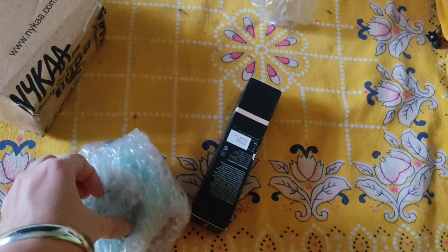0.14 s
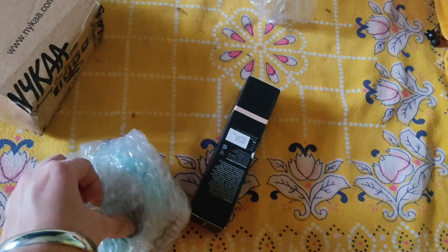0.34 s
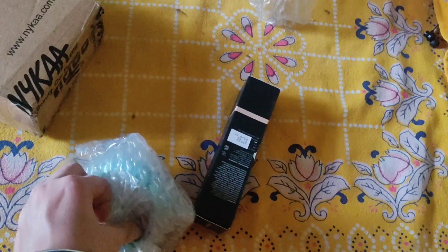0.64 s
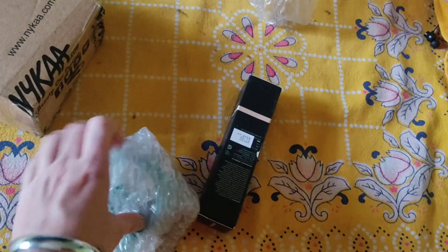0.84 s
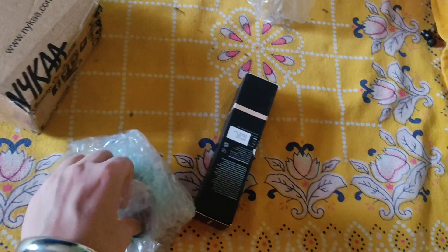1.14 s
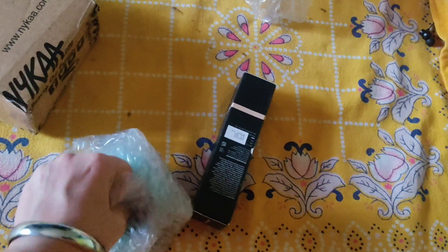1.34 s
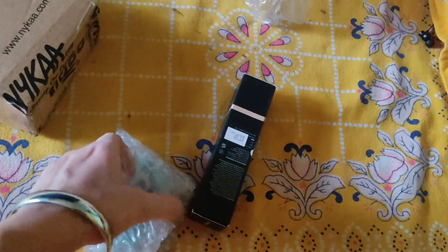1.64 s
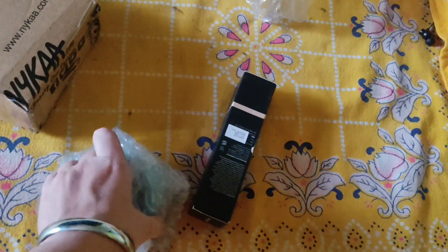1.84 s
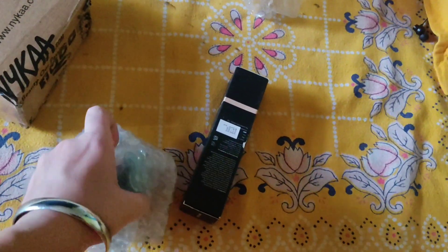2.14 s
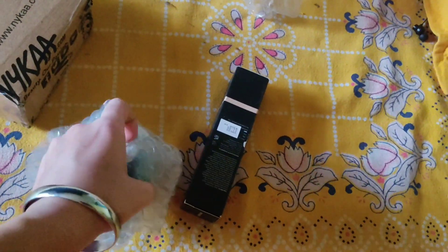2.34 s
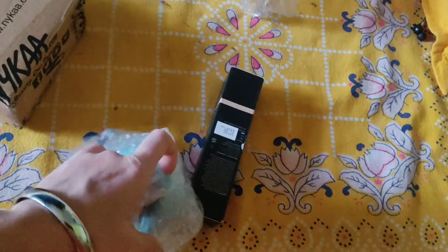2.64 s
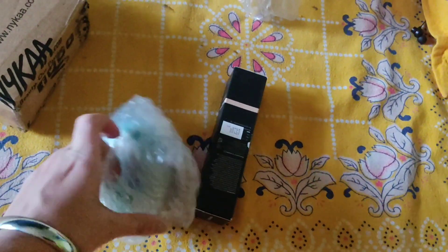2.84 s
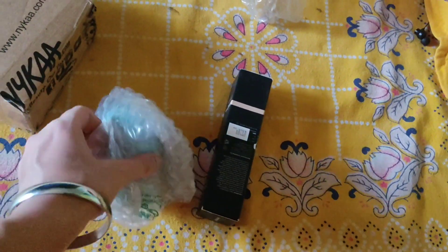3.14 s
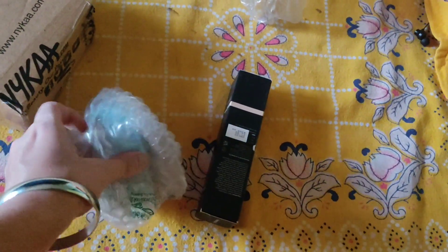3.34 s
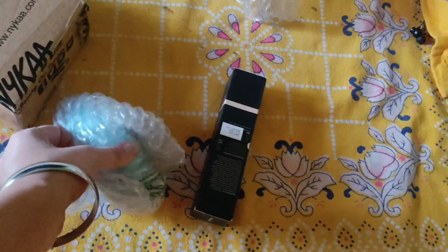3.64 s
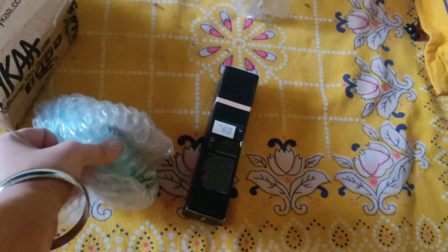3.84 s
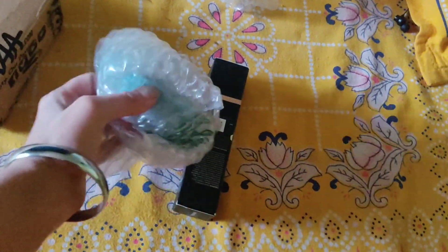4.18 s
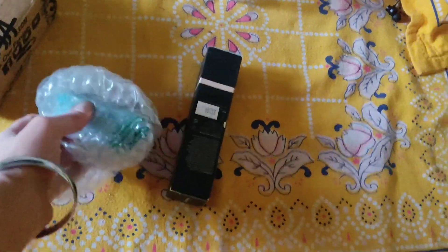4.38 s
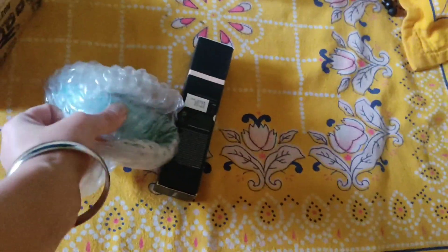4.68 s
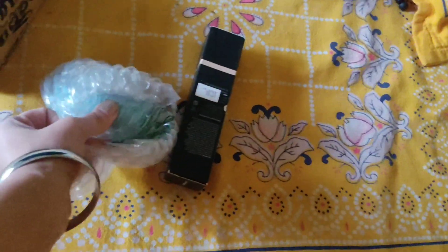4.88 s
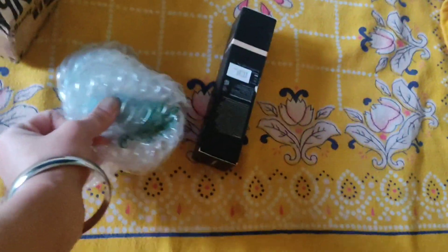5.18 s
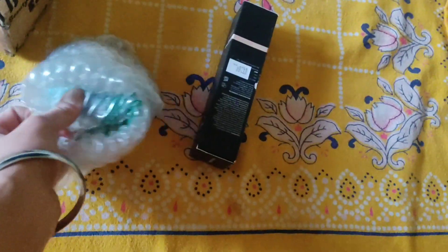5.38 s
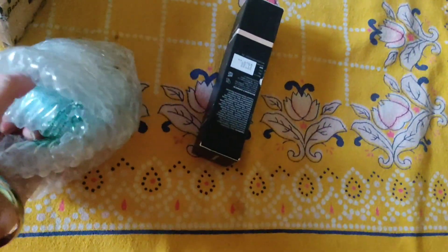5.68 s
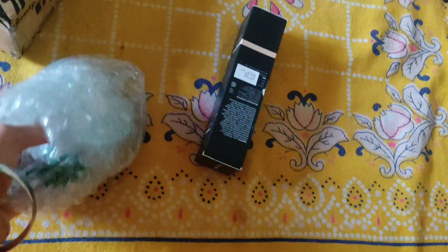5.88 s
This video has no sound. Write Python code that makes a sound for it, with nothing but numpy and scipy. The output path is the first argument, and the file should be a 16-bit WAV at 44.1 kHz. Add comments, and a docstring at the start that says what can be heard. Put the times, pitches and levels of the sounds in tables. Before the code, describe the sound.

Close plastic crackling runs from start to finish as bubble wrap around a parcel is gripped, released and turned by hand. Each squeeze brings a fizzy crunch and crisp single clicks, mixed with occasional dull bumps and light pattering from the parcel itself. The sound is indoors and near the phone microphone, with a slight room tail over quiet, low handling rumble.

```python
"""On a bed, close to a phone's two microphone ports, a hand squeezes and turns a bubble-wrapped parcel.
Creases in the film buckle as dense crackle and lone sharp snaps; the hollow parcel answers with dull
knocks and a soft patter. A hard surface sends each snap back a few milliseconds later, and the room
adds a short tail over a low rumble."""
import sys
import numpy as np
from scipy import signal
from scipy.fft import rfft, irfft
from scipy.io import wavfile

SR = 44100
rng = np.random.default_rng(int(sys.argv[2]) if len(sys.argv) > 2 else 0)


def master(y):
    """Save y as 16-bit WAV."""
    cut = np.clip(np.atleast_2d(y).T, -1, 1)
    pcm = np.round(cut * 32767)  # scale
    wavfile.write(sys.argv[1], SR, pcm.astype(np.int16))


N = 265305

# Knocks on the parcel: (time [s], level [dB], deep-mode boost [dB], pitch of the struck side [Hz])
KNOCKS = [(0.398, -22.5, -7, 493), (0.493, -37.5, 5, 590), (0.851, -27.5, 4.5, 302), (0.973, -34, 4, 396),
          (1.003, -31.5, 6, 340), (1.153, -34, 1, 384), (1.426, -14.5, 1, 292), (1.436, -25, 9, 155),
          (1.61, -35, -13, 182), (2.197, -35, 1, 297), (2.616, -35, -1, 194), (2.687, -37.5, 3, 297),
          (2.908, -41.5, 4, 334), (3.382, -28, 3, 358), (3.457, -26.5, 1, 435), (3.889, -36, -20, 186),
          (4.069, -34.5, -6, 275), (4.089, -34.5, 0, 347), (4.319, -36.5, -5, 450), (4.328, -32, 11.5, 185),
          (4.385, -43, -3, 180), (4.57, -47.5, 19, 233), (5.204, -35.5, -7, 331), (5.25, -14.5, -13, 345),
          (5.538, -42, 19, 282), (5.553, -38, 6, 225), (5.574, -31.5, 17.5, 265), (5.81, -34, -10, 380)]
LEFT_LAG_MS = 0.2256


def from_db(db):
    """Decibels to gain."""
    return 10 ** (np.asarray(db) / 20)


def rms_one(x):
    """Scale to unit rms."""
    return x / np.sqrt(np.mean(x ** 2) + 1e-20)


def energy_one(x):
    """Scale each channel to unit energy."""
    return x / np.sqrt(np.sum(x ** 2, axis=-1, keepdims=True))


def pan(left_over_right_db):
    """Left and right gains, this many dB apart."""
    return from_db(left_over_right_db / 2 * np.array([[1], [-1]]))


def automation(rows):
    """Turn rows of (time [s], values...) into one per-sample curve for each value."""
    times, *columns = np.transpose(rows)
    return [np.interp(np.arange(N) / SR, times, column) for column in columns]


def drift(rate_hz):
    """Slow random wander of unit rms."""
    pole = np.exp(-2 * np.pi * rate_hz / SR)
    return rms_one(signal.lfilter([1], [1, -2 * pole, pole * pole], rng.standard_normal(N + SR))[SR:])


def band(x, low_hz, high_hz):
    """Band-pass."""
    return signal.sosfilt(signal.butter(2, [low_hz, high_hz], "band", fs=SR, output="sos"), x)


def colour(x, hz, db, size=4096):
    """Minimum-phase EQ through the given points."""
    log_hz = np.log(np.maximum(np.fft.rfftfreq(size, 1 / SR), 1))
    cepstrum = irfft(np.log(from_db(np.interp(log_hz, np.log(hz), db))))
    cepstrum[1:size // 2] *= 2
    cepstrum[size // 2 + 1:] = 0
    return signal.fftconvolve(x, irfft(np.exp(rfft(cepstrum))))[:N]


def ring(force, hz, t60):
    """One resonant mode: each impulse starts a dying sine."""
    pole, step = from_db(-60 / (t60 * SR)), 2 * np.pi * hz / SR
    return signal.lfilter([0, np.sin(step)], [1, -2 * pole * np.cos(step), pole * pole], force + 1e-18)


def late_left(x, ms):
    """The parcel is nearer the right port, so the left hears it later."""
    samples = np.arange(x.shape[1])
    return np.array([np.interp(samples - ms * SR / 1000, samples, x[0], left=0), x[1]])


def room_tone(level_db=-51.5):
    """Steady, dark room and handling noise, leaning left."""
    # Noise spectrum: (frequency [Hz], relative level [dB])
    spectrum = [(20, 25), (40, 8), (110, -18), (200, 8), (500, -2), (1500, -16), (4000, -40), (9000, -30),
                (12000, -47)]
    sides = [rms_one(colour(rng.standard_normal(N), *np.transpose(spectrum))) for _ in range(2)]
    return from_db(level_db) * pan(5) * np.array(sides)


def handling_bass(level_db, swing_db=0.5):
    """Deep handling rumble that swells slightly at random."""
    bass = rms_one(band(rng.standard_normal((2, N)), 49, 100))
    return from_db(level_db - swing_db * drift(5.1)) * bass


def room(x, echo_db, echo_ms=7.4, tail_db=-16, t60=0.2):
    """Add a slap off a hard surface and a short diffuse tail, unrelated at the two ports."""
    t = np.arange(SR // 2) / SR
    tail = rng.standard_normal((2, len(t))) * from_db(-60 * t / t60) * (t > 0.0015)
    response = from_db(tail_db) * energy_one(tail)
    response[:, round(echo_ms * SR / 1000)] += from_db(echo_db)
    return x + signal.fftconvolve(x, response, axes=1)[:, :N]


def ports(x):
    """Each microphone port colours the sound with its own treble resonances."""
    # Port response: (frequency [Hz], left gain [dB], right gain [dB])
    port_eq = [(99, -22.5, -40), (323, -35, -34.5), (1040, -18.5, -20), (1400, -22.5, -23.5),
               (2790, -14.5, -16), (4200, -20.5, -16), (5070, -13.5, -16.5), (5710, -7.5, -11.5),
               (7730, -6, 0.5), (7690, -11, 0), (8810, -1, -17), (9686, -6.5, -17.5), (9740, -74, -14.5),
               (11070, -18, -23.5), (12900, -25.5, -30), (17300, -25, -22)]
    hz, left_db, right_db = np.transpose(port_eq)
    return np.array([colour(x[0], hz, left_db), colour(x[1], hz, right_db)])


def scuff(share_db=-15, fall_db_per_s=270):
    """Gain of the extra patter that each knock stirs up, dying away after it."""
    t = np.arange(0, N, 16) / SR
    gain = sum((t > start) * from_db(db + share_db - fall_db_per_s * np.maximum(t - start, 0))
               for start, db, *_ in KNOCKS)
    return np.interp(np.arange(N) / SR, t, gain)


def knock_force(hz, is_deep, drive_db, size=1300):
    """Soft contacts swell one mode up; drive_db holds its gain for each knock."""
    t = np.arange(size) / SR
    force = np.zeros(N)
    for (start, db, deep_db, side_hz), mode_db in zip(KNOCKS, drive_db):
        contact_ms = 0.81 + 0.1 * max(deep_db, 0) * is_deep   # deeper knocks swell more slowly
        age = t * 1000 / contact_ms
        swell = age * np.exp(-age) * np.sin(2 * np.pi * hz * t)
        boost_db = deep_db - 17.5 * abs(np.log2(hz / side_hz))   # weak far from the struck side's pitch
        at = round((start + 0.002136) * SR)   # the body answers just after the touch
        force[at:at + size] += from_db(db + mode_db + boost_db * is_deep) * swell / np.sum(np.abs(swell))
    return force


def parcel(patter_db, deep_below_hz=620):
    """Dull knocks and a patter of small contacts ring the hollow parcel."""
    # Body modes: (frequency [Hz], relative level [dB], time to fall 60 dB [s])
    modes = [(154.4, -7.5, 0.052), (194.4, -5.5, 0.038), (260.3, -4.5, 0.036), (343, -0.5, 0.02),
             (480.5, -4.5, 0.032), (590, -4, 0.029), (690, 4, 0.0096), (874, -1, 0.037), (996.6, -5, 0.045),
             (1218, 4, 0.0081), (1667, 8, 0.0063), (2506, 10.5, 0.0079)]
    contacts = rng.standard_normal(N) * from_db(drift(6.3))
    scatter_db = rng.normal(0, 1.6, (len(KNOCKS), len(modes)))
    knocks, patter = 0, 0
    for k, (hz, mode_db, t60) in enumerate(modes):
        is_deep = hz < deep_below_hz
        force = knock_force(hz, is_deep, mode_db + scatter_db[:, k])
        pickup = pan(5 if is_deep else 0.8) * (-1) ** k   # deep modes reach the left port better
        knocks += pickup * ring(force, hz, t60)
        patter += pickup * ring(contacts * from_db(mode_db), hz, t60)
    body = knocks + (from_db(patter_db) + scuff()) * rms_one(patter)
    # The microphone's low cut thins the deep bass of the knocks and patter.
    low_cut = signal.butter(4, 120, "highpass", fs=SR, output="sos")
    return late_left(signal.sosfilt(low_cut, body), LEFT_LAG_MS)


def grip(attack_s=0.0061, release_db_per_s=141, resting_db=-34.5):
    """Each squeeze rises fast, holds and lets go; returns curves of crackle level and dull share in dB."""
    # Squeezes: (start [s], hold [s], fine crackle level [dB], dull creases over fine ones [dB])
    squeezes = [(0, .035, -23.5, -22), (0.075, 0.28, -21, -23), (0.387, 0.033, -17.5, 4),
                (0.493, 0.025, -24.5, 8), (0.598, 0.043, -23.5, -25), (0.725, 0.12, -14, -18),
                (0.902, .045, -26, -8), (0.969, .07, -13, -6), (1.128, .25, -19, -1), (1.4, 0.12, -21, 12),
                (1.588, 0.031, -12, -1.5), (1.761, .04, -22, 4), (1.811, .03, -19, -20),
                (1.883, 0.079, -22.5, -2), (1.981, .2, -20, -0.5), (2.198, .03, -15, -1.5),
                (2.27, .19, -23.5, 1), (2.53, 0.044, -23, -12), (2.58, 0.041, -13.5, -10),
                (2.68, 0.18, -18.5, 1), (2.932, 0.034, -22, 1), (2.974, 0.038, -19, -17),
                (3.059, 0.13, -25, -11), (3.199, 0.045, -28.5, 0), (3.341, 0.047, -19, -7),
                (3.373, 0.034, -20, 7.5), (3.445, .03, -15.5, 7), (3.547, 0.033, -27, 6),
                (3.623, .06, -22, -4), (3.716, 0.029, -18, 0), (3.809, .11, -20.5, 2.5),
                (3.96, 0.12, -29, 1), (4.059, 0.047, -20.5, 0), (4.151, .1, -25, 1),
                (4.311, .09, -16, -2.5), (4.5, .05, -26, 1), (4.597, 0.11, -24, 1.5),
                (4.75, 0.05, -29.5, -9), (4.823, 0.029, -21, 1.5), (4.859, 0.12, -19.5, 4),
                (4.96, 0.063, -16.5, -22), (5.078, .08, -24, -19), (5.19, 0.044, -19.5, -5),
                (5.25, 0.027, -22.5, 11), (5.325, 0.031, -25.5, -13), (5.433, .045, -14.5, -5),
                (5.521, .14, -17, 6.5), (5.69, 0.16, -18.5, 0.5), (5.841, .2, -16.5, -2)]
    t = np.arange(0, N, 16) / SR
    fine, dull = from_db(2 * resting_db), from_db(2 * (resting_db + 7))   # rustle power between squeezes
    for start, hold, db, dull_db in squeezes:
        attack = np.clip((t - start) / attack_s, 0, 1)
        release_db = release_db_per_s * np.maximum(t - start - hold, 0)
        power = (attack * from_db(db - release_db)) ** 2
        fine += power
        dull += power * from_db(2 * dull_db)
    return automation(np.transpose([t, 10 * np.log10(fine), 10 * np.log10(dull / fine)]))


def buckle(length_ms, click_db, likeness=0.62, lag_spread_ms=0.085, size=512):
    """One crease gives way: a click, then a burst of film flutter, only partly alike at the two ports."""
    noise = rng.standard_normal((3, size))
    flutter = np.sqrt(likeness) * noise[0] + np.sqrt(1 - likeness) * noise[1:]
    age = np.arange(size) / SR * 4000 / length_ms   # four time constants to the length
    burst = energy_one(flutter * np.sqrt(age) * np.exp(-age))
    burst[:, 2] += from_db(click_db)
    return late_left(burst, LEFT_LAG_MS + lag_spread_ms * noise[0, -1])


def creases(base_per_s, length_ms, spots=12, size_spread_db=4, clump_db=2.5):
    """Creases buckle in random clumps, a few far bigger than the rest; each spot favours its own pitch."""
    sizes = from_db(size_spread_db * np.minimum(rng.exponential(1, N), 4)) * rng.choice([-1, 1], N)
    buckles = rng.random(N) < base_per_s * from_db(clump_db * drift(30)) / SR
    spot = rng.integers(0, spots, N)
    out = 0
    for k, hz in enumerate(np.geomspace(4800, 9200, spots)):
        burst = buckle(length_ms, click_db=-7)
        grain = energy_one(burst + from_db(7) * band(burst, hz / 1.145, hz * 1.04))
        triggers = sizes * buckles * (spot == k)
        out += signal.oaconvolve(triggers[None], grain)[:, :N]
    return rms_one(out)


def crackle(level_db, dull_db, pan_db):
    """Fine creases give the bright fizz; wide ones, fewer and slower, give the duller crunch."""
    fine = creases(1500, length_ms=1.85)
    wide = band(creases(900, length_ms=8.1), 1000, 4930)
    return from_db(level_db) * pan(pan_db) * (fine + from_db(dull_db) * wide)


def snaps(typical_ms=1.4, top_db=-4.5):
    """Each lone snap is one strong crease: a hard-fronted, bright crack with some midrange weight."""
    # Snaps: (time [s], treble level [dB], 4-6 kHz share [dB], 2-4 kHz share [dB], left over right [dB])
    cues = [(0.0744, -1, 5, -8, 0.0), (0.0983, -2, 6, -16, 6), (0.1011, 10.5, -10, -26, -2),
            (0.1138, 5, -9.0, -13, -5.0), (0.1356, 5, -11.0, -9, -7), (0.223, 3.5, -10, -15, -2),
            (0.229, 9, -5, -24, -2), (0.255, 4, 1.0, -22, 1.0), (0.2876, -1.0, 7, -21.0, -1.0),
            (0.3317, 2, -12, -25, -7), (0.3529, 4, -1, -12, -1.0), (0.3642, -3, 0, -18.0, -9.0),
            (0.3764, 14.5, 1, -6.5, 7), (0.392, 18.5, -2, -6.5, 8), (0.4001, 14, -4, -2, -2),
            (0.4041, 0, -3.0, 0, 5.0), (0.4953, 13.5, 6.5, 1, -6.5), (0.5559, -3, -7.0, -11, -9),
            (0.6125, 6.5, -9, -15, -1.0), (0.6183, 6.5, 0.0, -15, -1.0), (0.6925, 11.5, -9, -19, 3),
            (0.727, 3, 6, -10, -1), (0.7973, 4, -12.0, -12, 1), (0.808, 4, -14.0, -15.0, -9),
            (0.841, 1, -9.0, -12, 2.0), (0.9346, 3, -9.0, -19, -12), (0.9726, 4, -8, -7, 1),
            (0.98, 0, 3, 2.0, 3), (1.0039, 16, -1.0, -12, -3), (1.034, 6, -6.0, -20, -1),
            (1.1396, 1.0, -13, -5.0, 0), (1.1702, 4.5, 4, 3, 4.0), (1.2126, 4, 6, -16, 4),
            (1.224, 4, -5.0, -16, -9.0), (1.231, -2, 4, -6, -3.0), (1.3053, -2, 8, -16, -2),
            (1.377, 17, 0.5, -10, -5), (1.392, 3, -8.0, -14, -2.0), (1.42, 7, -2.0, -16, -8),
            (1.4263, 10, 6, 13, 1.5), (1.4572, 11.0, 10, 5.5, 3), (1.5077, 12.5, 5.5, 2.5, 0),
            (1.542, 4, -12, -8, -9), (1.5846, 4, -13.0, -10.0, -3), (1.5985, 7, -2, -9, -8),
            (1.604, 1.5, -11.0, -1, -10), (1.611, 7, -13.0, -4.0, -1.0), (1.6155, 1, 1, 3.5, 15),
            (1.6221, 4, -4.0, -14.0, -13), (1.7874, -1, -3.0, -16, -8.0), (1.8197, -4, -9.0, -14, -5.0),
            (1.938, 7.0, -3, -20, 2.0), (2.0346, 2.5, 0, -4.0, -3), (2.0752, 1.5, -12, -3.5, -2),
            (2.097, -2, 7, -1, -4), (2.1292, 8, -2, -4, 1.0), (2.1404, 1, 5, -6, -5),
            (2.2009, 11, 10, 12, -5.5), (2.2439, -3, -5, -1, 5.0), (2.2717, 8.5, 7, -8, 0),
            (2.2756, -10, -5, -3, 0), (2.4213, 3.5, -1, -3, -12), (2.4592, 4, 0, -17, -4),
            (2.521, -5, -4.0, -7, -4.0), (2.571, 5, -7.0, -13, 4.0), (2.5893, 8, -5.0, 2, -1),
            (2.5978, 7, -7, 0, 2), (2.6146, -6, -16.0, -9, -6), (2.6224, -3, -10, -2, -4),
            (2.6352, 7.0, -2, -14.0, -1), (2.6542, 3, 3, -15.0, -3), (2.73, 5, -6.0, -19.0, -8),
            (2.741, 5, -9, -7, 0), (2.756, -1, -4.0, -4, -5), (2.806, -5, 1, -6.0, -6),
            (2.8253, 12, -17, -28, -6), (2.9864, 3.5, 1, -8, -4), (3.0144, -7.5, -9, 3, -4),
            (3.0568, 8, -3, 1.5, -5), (3.0998, 7, -5, -9, -2), (3.1219, -3.5, 6.5, -19.0, -2),
            (3.162, -4.5, -9, -8, 0.0), (3.18, 1.0, -2, -6, -3), (3.29, -9, -4.0, -6.0, -1.0),
            (3.2985, 0.5, 0.5, -11, -3.0), (3.3057, 1, -12, -16, 4), (3.3383, 4, -3, -8, 0.0),
            (3.3821, 6.5, 1.0, 3.5, -4), (3.3873, 2, 0, 3.0, -2.0), (3.4164, 0, 0, 3, -2.0),
            (3.4289, -1, -5.0, -15.0, 4.0), (3.4586, 12.5, -4, -6, -10), (3.4664, -0.5, -4, 12.5, -3.0),
            (3.5566, 5.5, 2.0, -3, -5), (3.6303, -1.5, 4.0, 5.0, 2), (3.651, 1, 3, 1.5, -4),
            (3.6838, 0, -5.0, -6, -2.0), (3.725, 2, 6, -0.5, -11), (3.7511, 6, 5, 3.0, -3),
            (3.8721, -4.0, 2, -10, -13), (3.889, -1, 5, 5, -6), (3.897, 4, 3, -3, 4.0),
            (3.9578, 0, -3.0, 0, 4), (3.9939, -0.5, 6, 4.0, -4.0), (4.0014, 0.5, -5, -2, -7),
            (4.0866, -3, -5, -3, -7), (4.2934, 4.5, -3.0, -4.0, -1), (4.3768, 7.5, -10, -16, -8),
            (4.3839, 5, -7, -16, -1), (4.3974, 9.5, -1.0, -2, 0), (4.4548, 6, -13, -17, -6),
            (4.5207, 1.5, -9.0, -10, -9.0), (4.5486, -1.0, -8, -5, -6.0), (4.5996, 5, -7, 0, -2),
            (4.703, 2.5, -9, -6, -10), (4.7243, 0, 0, -2.0, -10), (4.8626, 5, -10.0, -12, 6),
            (4.876, 4, -4.0, -3, 2), (4.921, 4.0, -10.0, -15.0, -9), (4.9597, -2, -5, -14, -3.0),
            (4.986, 2, -3.0, -2.0, -3.0), (5.0045, 3, 3, -11, -7.0), (5.009, -9, -8, -12, 1),
            (5.0157, 1, -9.0, -15.0, 5), (5.088, 0.5, -16, -6, -3), (5.0925, 3, -11.0, -6, -3.0),
            (5.1375, 5.5, 0, -12, 3), (5.2055, 7, -5, -7, 2), (5.2521, 13.5, 9.5, 6, 2),
            (5.3274, 0.0, -10, -10.0, 13), (5.3512, -0.5, -3, -1, -7.0), (5.4046, 7.5, -8.0, -12, -2),
            (5.4074, 2, -10.0, -12.0, -1), (5.4514, 4, -4, 4.5, -5), (5.4642, 11, -5.0, -10.0, -2.0),
            (5.4689, 3, -8, -3, -1), (5.4975, -1, -5.0, -6, 0.0), (5.5044, -6, -6.0, -8, 0),
            (5.5208, 8, 4, 4.5, -4), (5.5251, 0, 1, 5, -5), (5.568, -2.5, -10, 9, 3),
            (5.611, 2, -11.0, -6.0, -1.0), (5.6165, 6, -4.0, 2, -9), (5.6513, 11.5, -3.5, 4.5, -5),
            (5.811, 1, 3, 12, -9), (5.887, 2, -3, -2, 5), (5.8958, 6, -5, -2, -3),
            (5.9147, -1, -16.0, -12.0, 1.0), (5.9311, 6, -2, -1, -4), (5.9638, 6, -9, -12.0, -5.0),
            (5.9841, 11, 1.5, -8.0, -1)]
    times, db, mid_db, dull_db, pan_db = np.transpose(cues)[..., None, None]
    bursts = np.array([buckle(typical_ms * rng.lognormal(0, 0.3), click_db=2.5) for _ in cues])
    treble = energy_one(band(bursts, 7150, 9860))
    top = from_db(top_db) * energy_one(band(bursts, 11300, 13400))
    mid = from_db(mid_db) * energy_one(band(band(bursts, 4110, 6400), 4110, 6400))
    dull = from_db(dull_db) * energy_one(band(band(bursts, 1700, 4300), 1700, 4300))
    cracks = from_db(db) * pan(pan_db) * (treble + top + mid + dull)
    size = cracks.shape[-1]
    out = np.zeros((2, N + size))
    for start, crack in zip(times.ravel(), cracks):
        at = round(start * SR)
        out[:, at:at + size] += crack
    return out[:, :N]


def scene():
    """The film, coloured by the ports, over the parcel's body and the low background."""
    # Slow changes as the parcel turns:
    # (time [s], patter at mean grip [dB], handling bass [dB], crackle left over right [dB])
    turning = [(0, -52.5, -63, -1.5), (0.7, -54.5, -59, -2), (1.4, -50, -66.5, -1.5),
               (1.8, -50.5, -62.5, -2.5), (2.4, -63, -63, -2), (2.8, -47, -63, -2), (3.4, -50, -60, -1.5),
               (4, -51, -59, -2.5), (4.6, -49, -57, -2.5), (5.1, -46.5, -60, -2.5), (5.6, -47, -60, -2),
               (6.02, -49.5, -62, -4)]
    patter_db, bass_db, pan_db = automation(turning)
    crackle_db, dull_db = grip()
    patter_db += 0.53 * (crackle_db - crackle_db.mean())   # the patter partly follows the grip
    film = ports(room(crackle(crackle_db, dull_db, pan_db) + snaps(), echo_db=-12.5))
    background = room_tone() + handling_bass(bass_db)
    return film + room(parcel(patter_db), echo_db=-28) + background


def record(dry, cutoff_hz=16500):
    """The phone rounds off the loudest snaps, cuts the very top and clips at full scale."""
    rounded = 1.2 * np.tanh(dry / 1.2)
    high_cut = signal.cheby2(12, 70, cutoff_hz, fs=SR, output="sos")
    return np.clip(signal.sosfilt(high_cut, rounded), -1, 1)


dry = scene()
out = record(dry)
master(out)
```